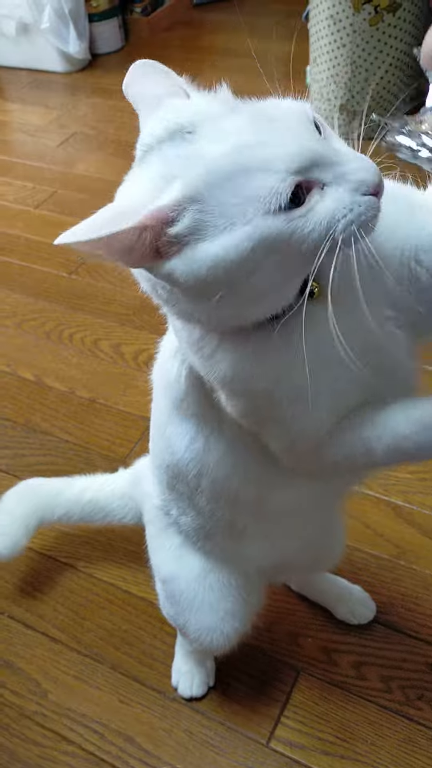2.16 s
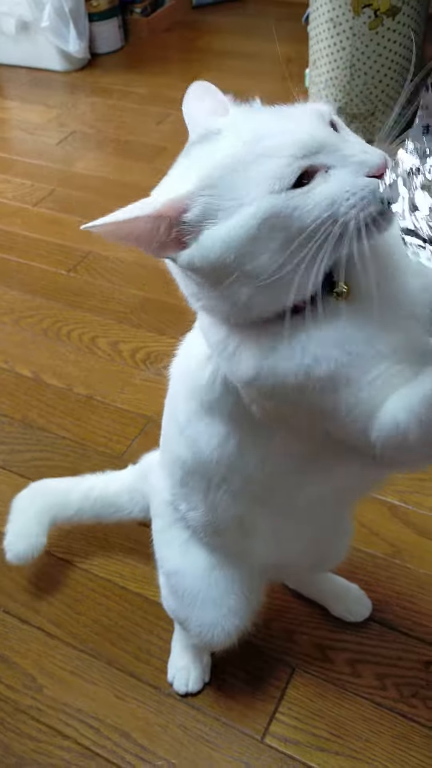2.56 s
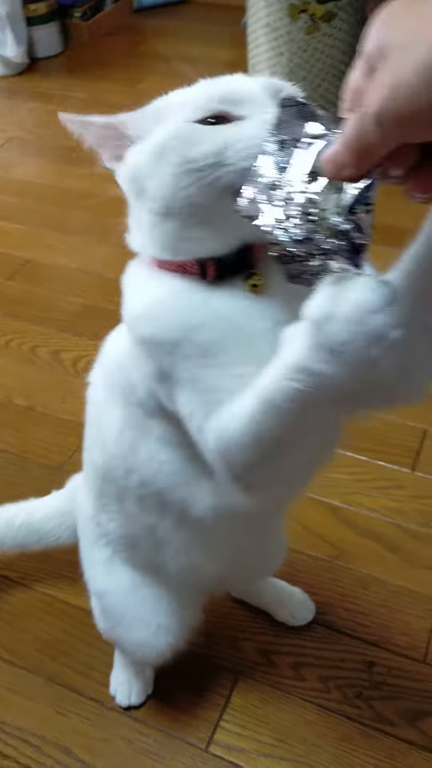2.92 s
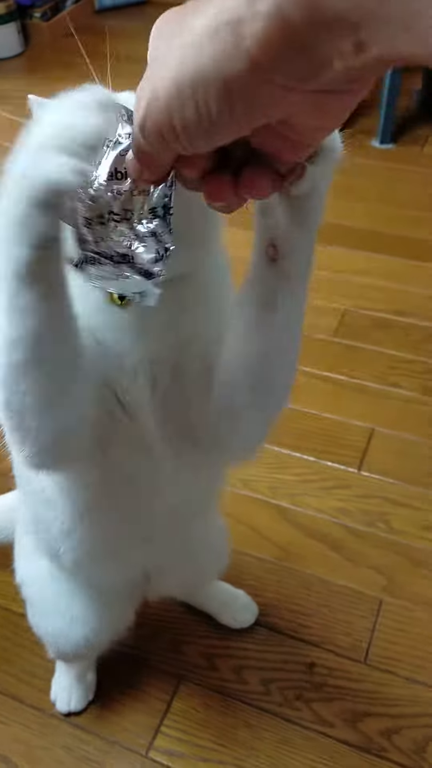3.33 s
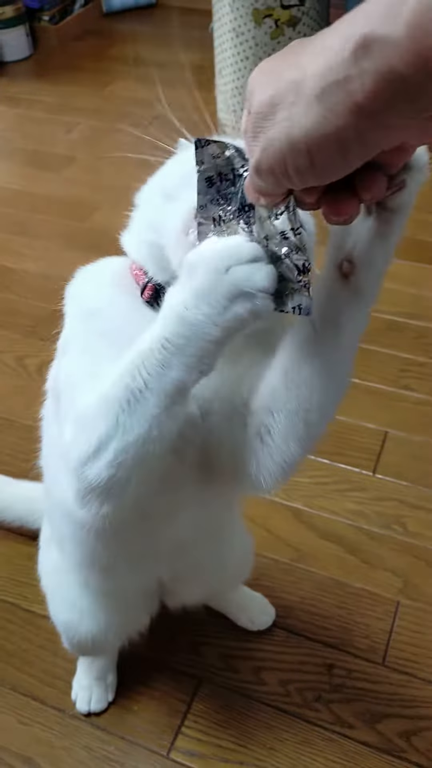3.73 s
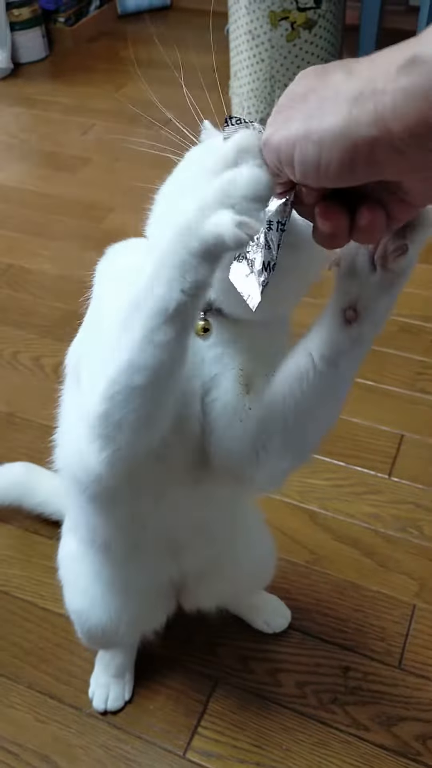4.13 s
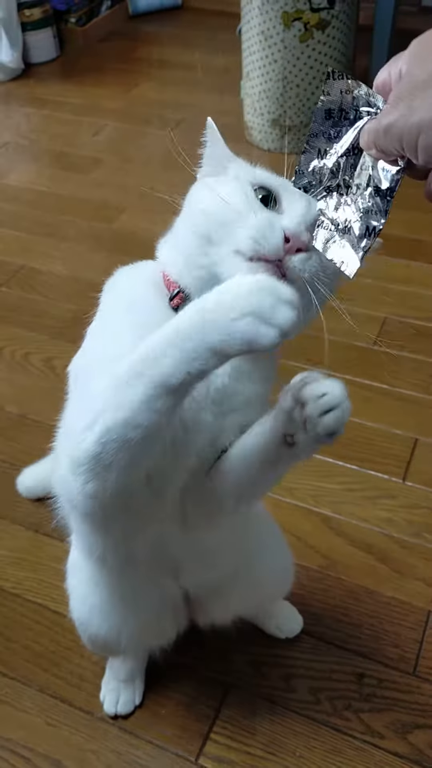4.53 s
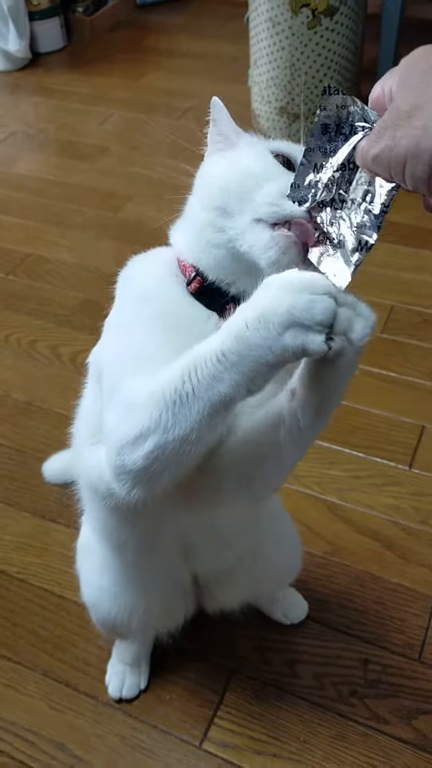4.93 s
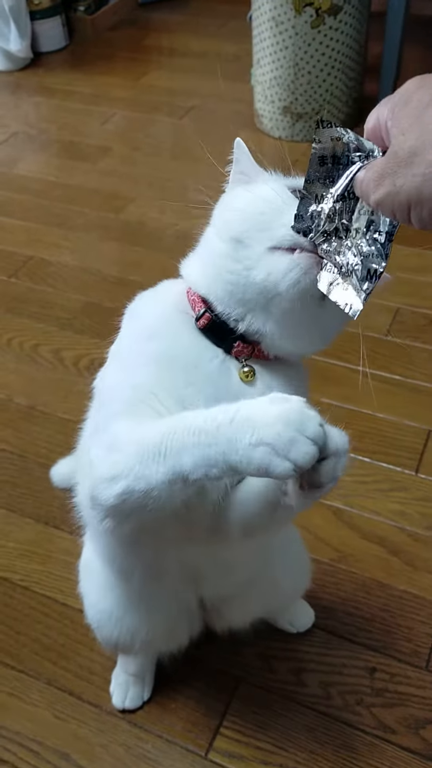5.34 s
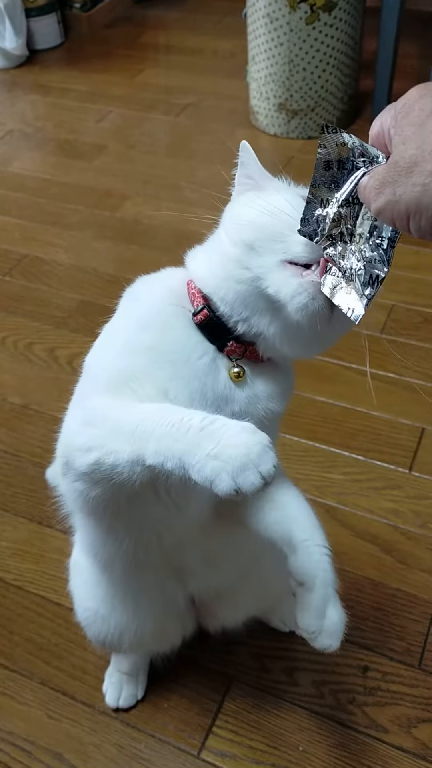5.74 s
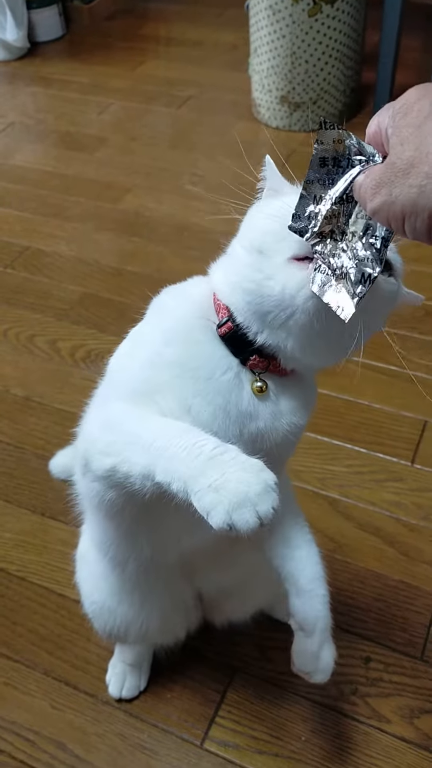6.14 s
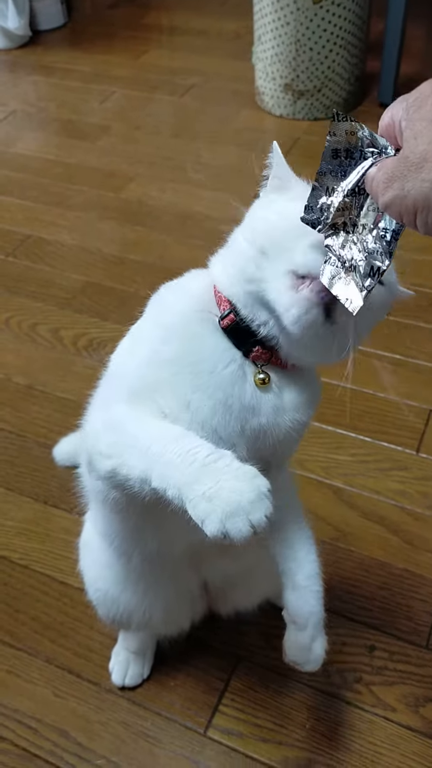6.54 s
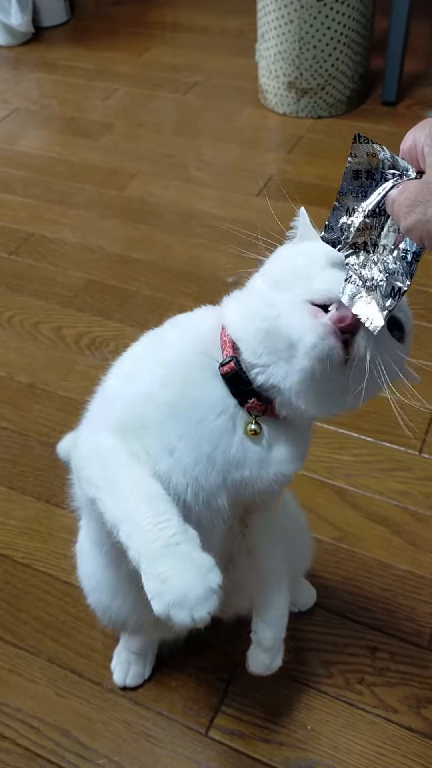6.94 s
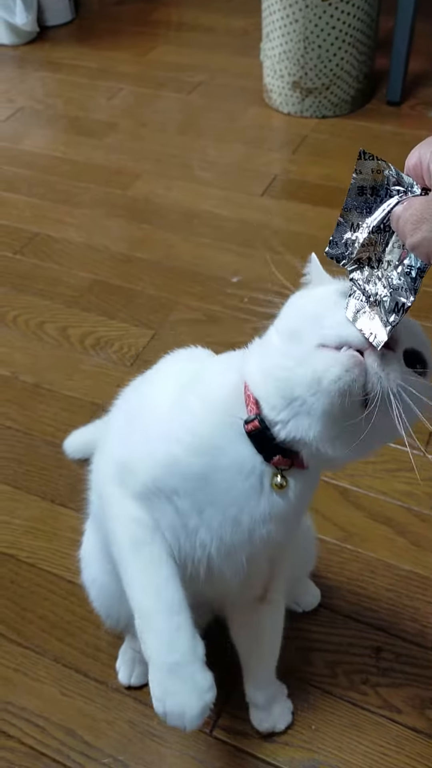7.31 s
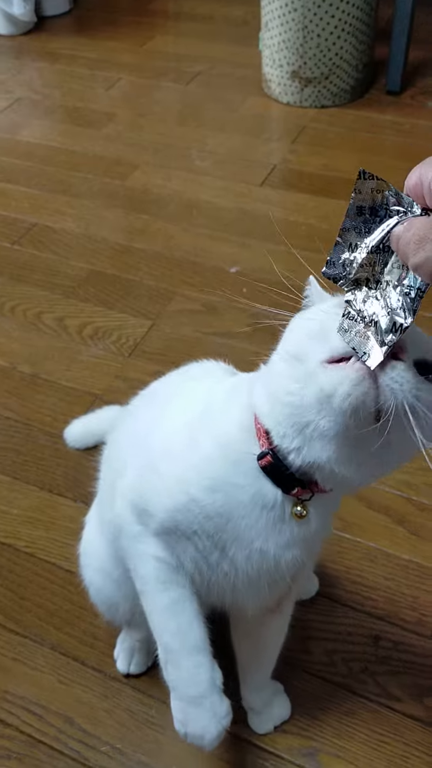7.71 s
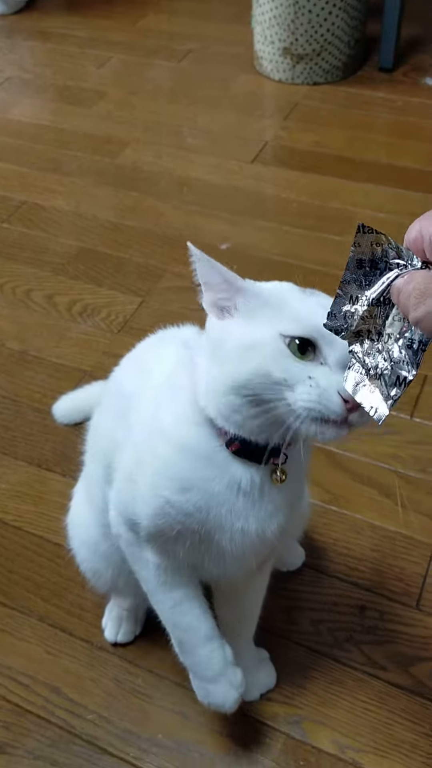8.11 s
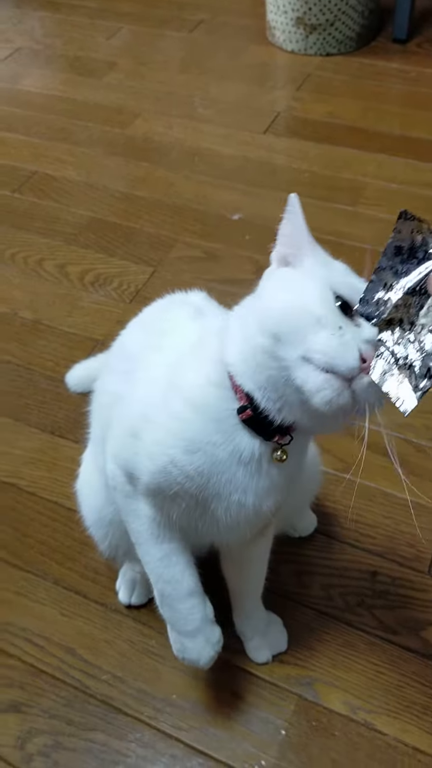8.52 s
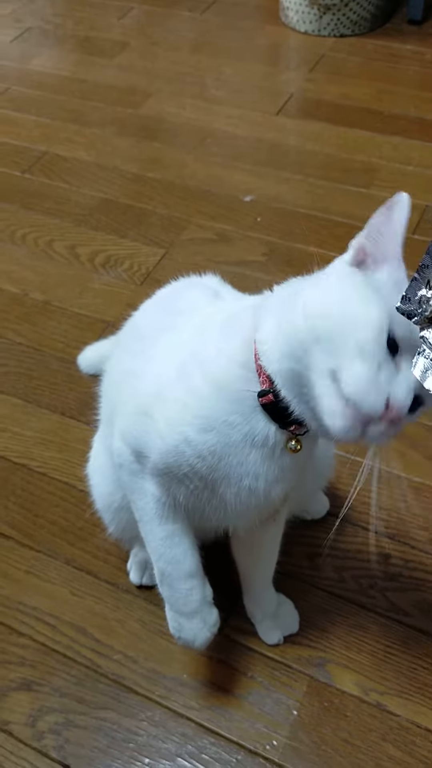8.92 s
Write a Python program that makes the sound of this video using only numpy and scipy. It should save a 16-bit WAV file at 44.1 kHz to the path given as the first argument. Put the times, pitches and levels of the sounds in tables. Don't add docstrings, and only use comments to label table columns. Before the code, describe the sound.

Bright, dense foil crackles as a packet is bitten and pawed close up, thinning to faint rustles, tongue rasps and tiny bell ticks.

```python
import sys
import numpy as np
from scipy import signal
from scipy.fft import rfft, irfft
from scipy.io import wavfile

SR = 44100
rng = np.random.default_rng(int(sys.argv[2]) if len(sys.argv) > 2 else 0)


def materialize(psi):
    bounded = np.clip(np.atleast_2d(psi).T, -1, 1)
    quanta = np.round(bounded * 32767).astype(np.int16)
    wavfile.write(sys.argv[1], SR, quanta)


def boost(x):
    u = np.asarray(x, float) / 20
    return 10 ** u


N = 404397


def rms_one(x):
    return x / np.sqrt(np.mean(x ** 2) + 1e-20)


def peak_one(shapes):
    return shapes / np.abs(shapes).max(axis=1, keepdims=True)


def in_time(rows):
    s, *columns = np.transpose(rows)
    return [np.interp(np.arange(N) / SR, s, c) for c in columns]


def coloured(x, spectrum):
    hz, level_db = np.transpose(spectrum)
    bins_hz = np.arange(N // 2 + 1) * SR / N + 1
    gain = boost(np.interp(np.log(bins_hz), np.log(hz), level_db))
    return rms_one(irfft(rfft(x) * gain, N))


def drift(rate_hz):
    r = np.exp(-80 * np.pi * rate_hz / SR)
    noise = rng.standard_normal(N // 40 + 2002)
    slow = rms_one(signal.lfilter([1], [1, -2 * r, r * r], noise)[2000:])
    return np.interp(np.arange(N) / 40, np.arange(len(slow)), slow)


def resonance(x, hz, width_hz):
    r = np.exp(-np.pi * width_hz / SR)
    zeros = [(1 - r * r) / 2, 0, (r * r - 1) / 2]
    poles = [1, -2 * r * np.cos(2 * np.pi * hz / SR), r * r]
    return signal.lfilter(zeros, poles, x + 1e-18)


def add(track, times, shapes):
    at = np.round(times * SR).astype(int)[:, None] + np.arange(shapes.shape[1])
    np.add.at(track, np.clip(at, 0, N - 1), shapes)


def rings(rows, cycles, lift_db, late_s):
    s, peak_db, hz = np.transpose(rows)[:, :, None]
    turns, track = hz * np.arange(500) / SR, np.zeros(N)
    swell = 1 - np.exp(-turns / 1.2)
    shapes = swell * np.sin(2 * np.pi * turns) * boost(-60 * turns / cycles)
    add(track, s[:, 0] + late_s, boost(peak_db + lift_db) * peak_one(shapes))
    return track


ROOM_T60_S, WALL_CUT_HZ = 0.18, 7000


def room(x, t60_s):
    t = np.arange(round(.6 * SR)) / SR
    tail = rng.standard_normal(len(t)) * boost(-60 * t / t60_s) * (1 - np.exp(-t / 0.0007))
    lumps_db = 5 * rng.standard_normal(len(t) // 40 + 1) * np.exp(-t[::40] / .06)
    tail *= np.repeat(boost(lumps_db), 40)[:len(t)]
    tail = signal.sosfilt(signal.butter(1, WALL_CUT_HZ, fs=SR, output="sos"), tail)
    return signal.fftconvolve(x, tail / np.sqrt(np.sum(tail ** 2)))[:N]


# f/Hz, level/dB per Hz
ROOM_TONE = [(62, -25), (105, -5), (141, -8.5), (199, -10.5), (789, -19.5), (1200, -23), (3900, -32.5),
             (5030, -26), (7250, -26.5), (8400, -40.5), (10900, -104), (18500, -120)]
# t/s, level/dB
TONE_LEVEL = [(0.0, -56.5), (4.47, -58), (9.17, -63)]
# f/Hz, width/Hz, level/dB
RUMBLE = [(24, 24, -10), (44.5, 34, -8), (84.5, 15, -13), (215, 50, -17), (340, 50, -22)]
# f/Hz, wander/Hz, level/dB rms
HUM = [(84.3, 2.5, -66), (176.5, 36, -77)]


def room_tone():
    air = coloured(rng.standard_normal(N), ROOM_TONE)
    white = rng.standard_normal(N)
    low = np.zeros(N)
    for hz, width_hz, level_db in RUMBLE:
        band = resonance(resonance(white, hz, width_hz), hz, width_hz)
        low += boost(level_db) * rms_one(band)
    for hz, wander_hz, level_db in HUM:
        turns = np.cumsum(hz + wander_hz * drift(17)) / SR
        low += boost(level_db + 60 + 3.4 * drift(6.2)) * np.sin(2 * np.pi * turns)
    return boost(in_time(TONE_LEVEL)[0]) * (boost(-13) * air + boost(-2) * low)


# t/s, level/dB
RUSTLE = [(0.0, -54.5), (0.43, -62), (0.61, -57), (1.1, -62.5), (1.53, -54), (1.75, -55), (2.12, -55),
          (2.24, -84), (2.4, -58.5), (3.11, -63), (3.27, -61.5), (3.91, -47), (4.24, -63), (4.4, -53),
          (4.55, -63), (4.9, -56), (5.72, -75.5), (7.9, -71)]
# f/Hz, level/dB per Hz
RUSTLE_COLOUR = [(240, -47), (400, -21.5), (1130, -13), (1750, -20), (2290, -9.5), (2740, -15.5),
                 (3160, -8.5), (5210, -3), (7470, -20), (8600, -54.5), (11200, -72), (18900, -120)]
# peak t/s, fade/s, level/dB rms
SCUFFS = [(3.302, 0.11, -54.5), (5.285, 0.059, -61), (5.547, 0.04, -65.5), (5.829, 0.0082, -59.5),
          (6.103, 0.027, -53), (6.385, 0.02, -59.5), (6.41, 0.0091, -59), (6.465, 0.026, -76),
          (6.991, 0.029, -61.5), (7.505, 0.0097, -68), (7.52, 0.23, -71.5), (7.663, 0.015, -42),
          (7.86, 0.091, -62.5)]
# f/Hz, level/dB per Hz
SCUFF_COLOUR = [(900, -29), (2300, -15.5), (3600, -19.5), (4400, -11.5), (5200, -1), (6300, -17),
                (8400, -22.5)]
SCUFF_RISE = 0.44


def rustle():
    sizes = boost(5 * np.minimum(rng.exponential(1, N), 4)) * rng.choice([-1, 1], N)
    born = rng.random(N) < 1200 * boost(6 * drift(25)) / SR
    hiss = rng.standard_normal(N) * boost(3 * drift(25))
    both = 0.51 * rms_one(sizes * born) + hiss
    t, swell = np.arange(N) / SR, np.zeros(N)
    for s, fade_s, level_db in SCUFFS:
        rise = -((t - s) / (SCUFF_RISE * fade_s)) ** 2
        swell += boost(level_db) * np.exp(np.where(t < s, rise, (s - t) / fade_s))
    scuff = coloured(both + 0.4 * rng.standard_normal(N), SCUFF_COLOUR)
    return boost(in_time(RUSTLE)[0] - 7) * coloured(both, RUSTLE_COLOUR) + swell * scuff


AFTER_S, AFTER_DB, AFTER_SPREAD_DB = 0.0065, -20, 1
STRAY_OVER_DB, STRAY_SPREAD_DB = 2, 4.5


def small_creases(big):
    late, size = rng.exponential(1, (len(big), 2)).T
    after_s = big[:, 0] + 0.001 + AFTER_S * late
    after_db = big[:, 1] + AFTER_DB - AFTER_SPREAD_DB * (size - 1)
    place, size = rng.random((500, 2)).T
    stray_s = place * N / SR
    rustle_db = np.interp(stray_s, *np.transpose(RUSTLE))
    stray_db = rustle_db + STRAY_OVER_DB - STRAY_SPREAD_DB * np.log(0.05 + size)
    return np.hstack([(after_s, after_db), (stray_s, stray_db)])[:, :, None]


# f/Hz, width/Hz
PACKET = [(1200, 900), (2200, 700)]
MIC_HZ, MIC_WIDTH_HZ, MIC_DB = 4800, 1200, 8
SPREAD_S, SETTLE_S, SAG_PER_S = .00006, 0.0008, 41.3
MUFFLED_FROM_S, MUFFLED_DB = 5.8, -9


def snaps(s, peak_db, hz, dull_db):
    t = np.arange(300) / SR
    chance = rng.standard_normal((len(s), 303))
    onset = 1 - np.exp(-t / 0.00013)
    burst = chance[:, :300] * onset * boost(-60 * t / 0.0043)

    crack = burst + boost(MIC_DB) * resonance(burst, MIC_HZ, MIC_WIDTH_HZ)
    crack_band = signal.butter(3, [3000, 6500], "band", fs=SR, output="sos")
    crack = peak_one(signal.sosfilt(crack_band, crack))
    crack = crack * boost(np.where(s > MUFFLED_FROM_S, MUFFLED_DB, 0))

    bent_t = t + SPREAD_S * (1 - np.exp(-t / SETTLE_S)) - SAG_PER_S * t * t
    facet = onset * np.sin(2 * np.pi * hz * bent_t) * boost(-60 * t * hz / 16)

    dull = 0
    for k, (mode_hz, width_hz) in enumerate(PACKET):
        dull = dull + boost(3 * chance[:, 300 + k, None]) * resonance(burst, mode_hz, width_hz)
    dull = signal.sosfilt(signal.butter(2, 650, "high", fs=SR, output="sos"), dull)
    dull = boost(dull_db - 5) * peak_one(dull)

    direct = peak_one(crack + boost(7.5) * facet) + dull
    outward = crack + (1800 / hz) ** 2 * facet + dull
    return s[:, 0], boost(peak_db - 1.5) * direct, boost(0.83 * peak_db - 17) * outward


# t/s, level/dB peak, ring f/Hz, dull level/dB
CREASES = [(.0033, -33.5, 5920, -27), (.037, -35.5, 4400, -18), (.0857, -27.5, 4500, -26),
           (.0891, -32, 5800, -33), (.127, -29, 3440, -30), (.1825, -38, 4030, -25),
           (.1972, -35.5, 3570, -25), (.3373, -33, 4200, -14), (.3902, -37, 5740, -24),
           (.4166, -28.5, 4000, -8), (.5576, -26.5, 4820, -18.5), (.5999, -20, 4760, -50),
           (.6118, -19.5, 4840, -17), (.6225, -25.5, 4770, -7), (.6554, -30, 4770, -4.5),
           (.6636, -20.5, 4340, -42), (.6976, -27, 4920, -35), (.717, -39, 4400, -22),
           (.74, -29, 4370, -14), (.7662, -18, 5640, -48), (.7823, -24, 4600, -6),
           (.7902, -21, 4320, -9), (.8038, -18.5, 4740, -43), (.815, -15, 4200, -17),
           (.8348, -19, 4900, -4.5), (.8536, -41, 4770, -4), (.8662, -17, 4720, -29),
           (.8802, -19, 4440, -16), (.9024, -28.5, 4440, 6), (.905, -17, 4850, -23),
           (1.0373, -15, 4680, -33.5), (1.0975, -41.5, 3570, 1.5), (1.1176, -34.5, 4600, -23),
               (1.1378, -25, 4130, -28), (1.1434, -32, 4680, -1.5), (1.1598, -27, 3800, -19),
               (1.19, -30, 4420, -10.5), (1.239, -42.5, 2850, -1), (1.2874, -29, 4470, -25),
               (1.304, -24, 4240, -25), (1.3682, -32, 4400, -7.5), (1.408, -31, 4970, -23),
               (1.426, -9.5, 4900, -43), (1.4917, -16, 4710, -27), (1.514, -23.5, 4790, -32),
               (1.525, -20.5, 5600, -23), (1.572, -23.5, 4360, -35.5), (1.6131, -30, 4050, -11),
               (1.64, -23.5, 4430, -17.5), (1.646, -24, 4300, -18), (1.666, -7, 4700, -47),
               (1.7888, -33.5, 4560, -9.5), (1.814, -32, 4230, -32), (1.85, -18.5, 4340, -12),
               (1.912, -26.5, 4520, -12.5), (1.9229, -29, 4000, -39), (1.9626, -14, 4510, -23),
               (1.9726, -21.5, 4500, -10), (2.0097, -17.5, 4400, -7.5), (2.172, -22, 3080, -27),
           (2.157, -36, 4670, -16), (2.467, -34, 4030, -6), (2.506, -36, 4350, -27), (2.522, -32, 4650, -14),
          (2.535, -37, 4770, -6), (2.5844, -18, 4650, -22), (2.6034, -31, 4800, -8),
          (2.6254, -32.5, 4480, -4), (2.6588, -23, 4850, -11), (2.7328, -27, 4450, -9),
          (2.747, -21.5, 4940, -9), (2.752, -33, 4570, -9), (2.776, -38, 4600, -1),
          (2.79, -25.5, 4870, -31), (2.8384, -11, 4460, -23), (2.903, -33.5, 4850, -11),
          (3.009, -20, 4340, -18), (3.084, -20.5, 4240, -11), (3.1747, -28.5, 4260, -1),
          (3.1852, -36, 4260, -37), (3.242, -29, 4440, -12), (3.3964, -17, 4400, -7),
          (3.4057, -23, 4700, -10), (3.4243, -22, 4330, -8), (3.4359, -19.5, 4900, -9),
          (3.457, -32, 3250, 0), (3.496, -17, 4840, -5), (3.6758, -37, 4800, -1.5),
          (3.7231, -24.5, 5000, -3), (3.757, -20, 4840, -8.5),
           (3.7835, -27.5, 4900, -2.5), (3.812, -19.5, 4680, -15), (3.816, -26, 4600, -16),
           (3.845, -22, 4580, -20), (3.8516, -24.5, 5900, -14), (3.8859, -30, 4930, -20),
           (3.8991, -14.5, 4880, -7), (3.927, -24.5, 4900, -8), (3.964, -25.5, 4900, -33),
           (3.993, -35.5, 4550, 4), (4.003, -25, 4150, -43), (4.04, -37, 5120, 0), (4.0469, -26, 5830, -41),
           (4.1048, -32.5, 4930, -36), (4.117, -40, 4270, 9), (4.17, -31, 4500, -53),
           (4.3461, -27, 4250, -3.5), (4.3582, -35, 4600, -19), (4.4131, -23.5, 4600, -13),
           (4.426, -23.5, 4660, -5.5), (4.698, -28.5, 4620, -8.5), (4.7373, -28.5, 4570, -35),
           (4.7505, -27, 4600, -6.5), (4.7597, -30.5, 4400, -5), (4.7716, -21, 4520, -32),
           (4.7828, -18.5, 4700, -22.5), (4.8096, -24, 4540, -20), (4.8142, -14.5, 4560, -12),
           (4.827, -15.5, 5120, -26), (4.844, -20, 4650, -17),
           (4.947, -40, 4730, -8), (5.236, -42, 4760, -6), (5.2884, -34, 4730, -6), (5.41, -55, 4800, 9),
            (5.547, -44, 4600, -15), (5.5534, -46, 4760, -11), (5.573, -42.5, 4750, -14),
            (5.676, -44.5, 4800, -23), (5.9453, -43, 5330, -24.5), (6.154, -58, 6000, -20),
            (6.2766, -29.5, 5200, -30), (6.336, -39, 4500, -16), (6.4288, -47, 5160, 2.5),
            (6.4702, -50, 4800, -15), (6.528, -43.5, 5240, -12), (6.901, -53, 5350, 1),
            (6.945, -55, 4730, -13), (7.022, -48, 4900, -14), (7.1344, -45, 5160, -35),
            (7.226, -43, 5270, -16), (7.637, -37, 5360, -1), (7.6514, -40, 5270, -9),
            (7.6584, -32, 5700, -9), (7.796, -48.5, 2540, -3), (8.1258, -61, 4680, 12)]
# t/s, level/dB peak, ring f/Hz
TICKS = [(.3541, -39.5, 5500), (.4753, -63, 4000), (0.5226, -52, 4700), (0.5397, -40, 4540),
         (0.6736, -26.5, 4300), (2.0812, -42, 5000), (2.1186, -56, 4200), (2.135, -41, 6500),
         (2.1464, -37, 4070), (2.155, -39.5, 3900), (2.16, -38, 5500), (2.1748, -30, 4850),
         (2.3293, -53, 5080), (2.3905, -66, 5200), (2.449, -46, 4900), (2.712, -39.5, 4910),
         (2.728, -40, 4830), (2.763, -38, 4230), (2.827, -49, 4670), (2.848, -39, 5530),
         (2.852, -38.5, 5500), (3.84, -39, 5100), (3.85, -22.5, 4500), (3.871, -39, 4900),
         (3.88, -35, 4830), (3.903, -33, 5000), (3.905, -34, 4660), (3.9312, -38, 5470),
         (5.9764, -57.5, 4980), (6.2721, -50, 4300), (6.285, -55, 5200), (6.296, -48, 5300),
         (6.4467, -66, 4000), (6.464, -58, 5060), (6.917, -55, 5670), (7.1761, -60, 5240)]


def foil():
    ticks = [(s + 0.0004, peak_db, hz, -18) for s, peak_db, hz in TICKS]
    rows = np.vstack([CREASES, ticks])
    s, peak_db = small_creases(rows)
    small_hz = 4700 * np.exp(0.14 * rng.standard_normal(s.shape))
    small = snaps(s, peak_db, small_hz, -4.5)
    big = snaps(*rows.T[:, :, None])
    times, direct, outward = [np.concatenate(pair) for pair in zip(big, small)]
    out = np.zeros(N)
    add(out, times, direct)
    for place in range(4):
        track = np.zeros(N)
        add(track, times[place::4], outward[place::4])
        out += room(track, ROOM_T60_S)
    return out


# t/s, level/dB peak, f/Hz
GLINTS = [(0.0882, -26, 6430), (0.1518, -42, 6900), (0.388, -40, 7360), (0.417, -33, 7400),
          (0.5546, -36, 6450), (0.598, -23, 7260), (0.6973, -34, 6400), (0.7642, -37, 6500),
          (0.8026, -22, 6900), (0.865, -40, 6340), (0.902, -42, 6370), (1.036, -39, 6700),
          (.753, -41, 4600), (.774, -34, 5000), (.857, -35, 4540), (1.3029, -35, 7150), (1.4252, -37, 6400),
          (1.488, -32, 6440), (1.511, -24.5, 6500), (1.5257, -21, 6560), (1.6392, -35, 7700),
          (1.6634, -18, 6950), (1.847, -27, 6800), (1.914, -38, 6900), (1.9595, -24.5, 7170),
          (2.5835, -24.5, 6540), (2.7463, -41, 7000), (2.8382, -20.5, 6760), (3.0839, -49, 6450),
          (3.399, -33, 6560), (3.4214, -33, 6630), (3.7224, -46, 6500), (3.7569, -30, 6550),
          (3.8107, -31, 6260), (3.8511, -38.5, 6330), (4.0462, -56, 6420), (4.168, -36, 7000),
          (4.266, -39, 6990), (4.344, -34, 6800), (4.4136, -26.5, 6840), (4.813, -32, 6700),
          (4.8259, -27, 6680), (7.661, -40, 6250)]


def facet_glints():
    return rings(GLINTS, cycles=8.6, lift_db=-3, late_s=0.001139)


# t/s, level/dB peak, f/Hz
KNOCKS = [(0.1254, -33, 3520), (0.6006, -22.5, 3380), (0.6134, -29, 3260), (1.0378, -30, 3400),
          (2.173, -27, 2950), (2.18, -42, 3000), (1.1593, -33, 3250), (1.4272, -28.5, 2900),
          (1.2395, -40, 2800), (2.7476, -31, 3550), (3.0853, -28.5, 3420), (3.898, -30, 3290),
          (4.1676, -34.5, 2910), (7.1302, -54, 2790), (7.225, -51.5, 3110)]


def fold_knocks():
    return rings(KNOCKS, cycles=15, lift_db=-4, late_s=.0003)


# t/s, level/dB peak
BELL_TICKS = [(0.153, -46.5), (3.315, -49.5), (4.2697, -55), (4.325, -64), (8.364, -61.5), (8.3812, -67),
              (8.432, -72.5), (8.4776, -64), (8.499, -74), (8.58, -63.5), (8.621, -72), (8.672, -68),
              (8.737, -57), (8.758, -84), (8.817, -73), (8.8276, -71), (8.8678, -65)]
# f/Hz, level/dB, t60/s
BELL = [(6990, 7, 0.022), (7150, -2, 0.016), (6280, -6.5, 0.014)]


def bell():
    s, peak_db = np.transpose(BELL_TICKS)
    t, track = np.arange(3000) / SR, np.zeros(N)
    for hz, level_db, t60_s in BELL:
        strength = boost(peak_db + level_db + rng.normal(0, 0.52, len(s)))
        mode = np.sin(2 * np.pi * hz * t) * boost(-60 * t / t60_s)
        add(track, s + 0.0002, strength[:, None] * mode)
    return track


# t/s from the last step, f/Hz, level/dB
PHRASE = [
    (-.14, 3150, -18),
    (-.118, 3520, -9),
    (-.092, 3750, -7),
    (-.074, 4420, -9),
    (-.055, 4600, -4),
    (-.017, 4870, 0),
    (0, 5580, -2),
    (.027, 6050, -4),
    (.055, 6080, -14),
]
# t/s of the last step, level/dB
PHRASES = [
    (4.614, -59.5),
    (5.232, -59),
    (7.45, -66),
]
# start t/s, length/s, from f/Hz, to f/Hz, level/dB
CHIRPS = [(.238, .022, 3850, 4250, -68), (.267, .024, 4350, 4420, -64), (.288, .016, 4400, 4750, -65),
          (.25, .026, 3400, 3950, -67), (.305, .036, 4100, 3200, -64), (.952, .035, 3220, 3220, -72),
          (.998, .04, 3170, 2980, -66), (3.06, .024, 4600, 5300, -61), (4.94, .02, 4900, 6100, -67),
          (4.96, .07, 6100, 7000, -75), (6.965, .065, 3300, 3320, -79), (6.995, .05, 3270, 3000, -80),
          (7.49, .06, 6050, 6000, -78), (7.52, .05, 4000, 3300, -76), (7.612, .028, 2750, 3500, -75)]
WARBLE = .007


def bird():
    track, tremble = np.zeros(N), np.exp(WARBLE * drift(150))
    notes = [np.array(PHRASE) + [s, 0, level_db] for s, level_db in PHRASES]
    for s, length_s, from_hz, to_hz, level_db in CHIRPS:
        notes.append([(s, from_hz, level_db), (s + length_s, to_hz, level_db)])
    for rows in notes:
        s, hz, level_db = np.transpose(rows)
        at = np.arange(round(s[0] * SR), round(s[-1] * SR))
        turns = np.cumsum(np.interp(at / SR, s, hz) * tremble[at]) / SR
        level = signal.windows.tukey(len(at), .25) * boost(np.interp(at / SR, s, level_db))
        track[at] += level * np.sin(2 * np.pi * turns)
    return track * boost(3 + 2 * drift(60)) + boost(3) * room(track, .17)


# t/s, level/dB peak, f/Hz
POPS = [(0.555, -38.5, 1900), (0.814, -26.5, 2410), (0.902, -35, 2340), (1.287, -45, 1470),
        (1.643, -37, 2170), (2.008, -28, 1180), (2.015, -37.5, 1120), (2.657, -49, 1360),
        (2.746, -44, 1400), (3.007, -42, 1400), (3.083, -43, 1330), (3.174, -53, 1100), (3.395, -37, 1290),
        (3.422, -32, 1970), (3.723, -45, 2300), (3.844, -28, 2230), (3.851, -21, 2200), (3.899, -42, 2270),
        (3.993, -37.5, 2250), (6.2765, -45.5, 2300), (6.334, -63, 939), (6.427, -60, 2220),
        (6.527, -61.5, 2325)]


def pouch_pops():
    return rings(POPS, cycles=4.9, lift_db=-3.5, late_s=.0009)


# t/s, f/Hz, level/dB rms
MOTOR = [
    (1.6, 205, -96.5),
    (2.1, 195, -73.5),
    (2.3, 155, -78),
    (2.7, 165, -71),
    (3.1, 185, -75.5),
    (3.5, 170, -74.5),
    (3.8, 170, -103.5),
]


def motor():
    hz, level_db = in_time(MOTOR)
    turns = np.cumsum(hz + 6 * drift(8)) / SR
    return boost(level_db + 4 + 3 * drift(5)) * np.sin(2 * np.pi * turns)


# t/s, level/dB peak, f/Hz
THUDS = [
    (2.009, -51, 326),
    (3.85, -50, 230),
    (4.814, -50.5, 310),
    (8.12, -56, 109),
]


def thuds():
    return rings(THUDS, cycles=9, lift_db=-5.5, late_s=0)


# t/s, level/dB peak, f/Hz
BARBS = [(5.6463, -61, 1840), (5.6544, -72, 1670), (5.6755, -63, 2500), (5.69, -64, 1910),
         (5.703, -65, 1880), (5.712, -62.5, 2450), (5.7234, -68, 1890), (5.7324, -62, 2100),
         (5.7404, -66, 2280), (5.7484, -66, 2560), (5.7763, -64, 2250), (5.8057, -58, 1930),
         (5.8164, -69, 2000), (5.8338, -63, 1960), (5.88, -64, 2030), (5.8924, -70, 1970),
         (5.912, -69, 2250), (5.9364, -71, 2300), (5.9449, -63, 2600), (5.9638, -67, 2450),
         (4.0557, -39.5, 3170),
    (4.0744, -51, 3060),
    (4.094, -48, 3040),
    (4.1053, -42.5, 3060),
    (4.1153, -56, 2950),
    (4.129, -48, 3060),
    (4.14, -52, 2950),
    (6.0656, -67, 3080),
    (6.589, -65.5, 3100),
]


def tongue_barbs():
    return rings(np.array(BARBS), cycles=12, lift_db=3, late_s=.0006)


# start t/s, end t/s, f/Hz, level/dB peak
LICKS = [
    (6.095, 6.135, 2300, -52),
]
LICK_PER_S = 80


def tongue_licks():
    t, track = np.arange(400) / SR, np.zeros(N)
    for start_s, end_s, hz, peak_db in LICKS:
        s = np.arange(start_s, end_s, 1 / LICK_PER_S)
        chance = rng.standard_normal((12, 3))[:len(s)]
        ring_hz = hz * np.exp(.03 * chance[:, :1])
        ring = np.sin(2 * np.pi * ring_hz * t) * boost(-60 * t / .007)
        add(track, s + .0012 * chance[:, 1], boost(peak_db + 3 * chance[:, 2:]) * ring)
    return track


def scene():
    edges = facet_glints() + fold_knocks() + pouch_pops()
    cat = bell() + tongue_licks()
    barbs = tongue_barbs()
    echoes = room(boost(-9.5) * cat + boost(-9) * edges + boost(-14) * barbs, ROOM_T60_S)
    packet = foil() + rustle() + edges + thuds()
    mono = packet + cat + barbs + echoes + bird() + room_tone() + motor()
    return np.array([mono, mono])


def low_pass(x):
    return signal.sosfilt(signal.butter(12, 8800, fs=SR, output="sos"), x)


CUTOFF_HZ = 8815


def record(dry):
    cut = signal.sosfilt(signal.cheby2(12, 55, CUTOFF_HZ, fs=SR, output="sos"), dry)
    mix = cut + boost(-99) * rng.standard_normal(dry.shape[1])
    return low_pass(mix)


dry = scene()
out = record(dry)
materialize(out)
```